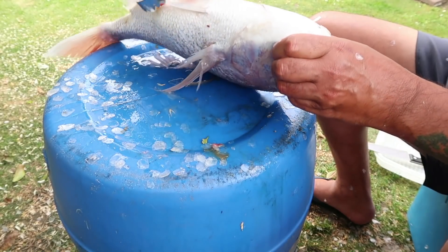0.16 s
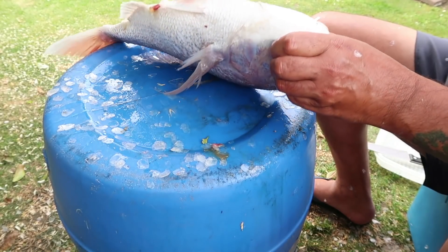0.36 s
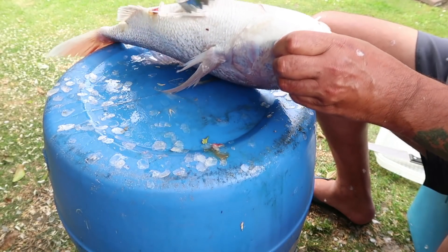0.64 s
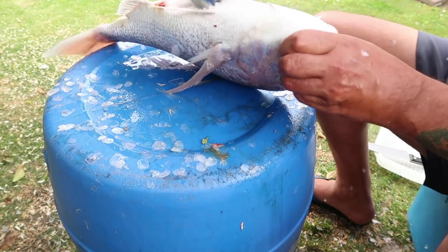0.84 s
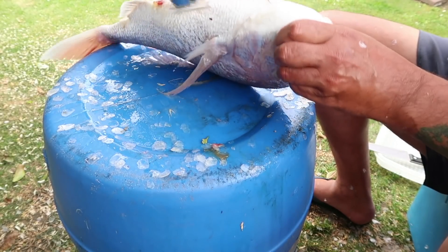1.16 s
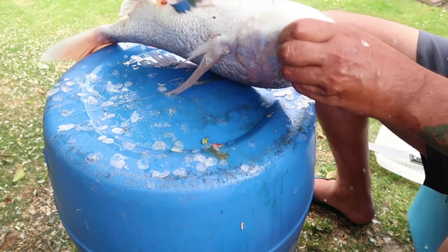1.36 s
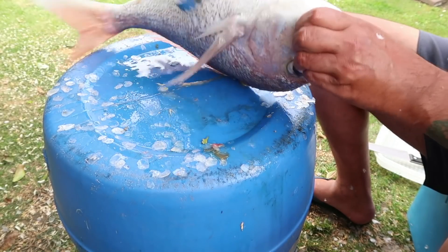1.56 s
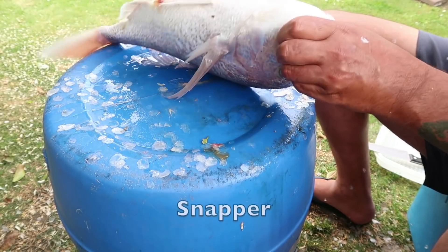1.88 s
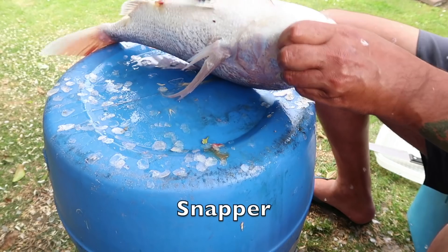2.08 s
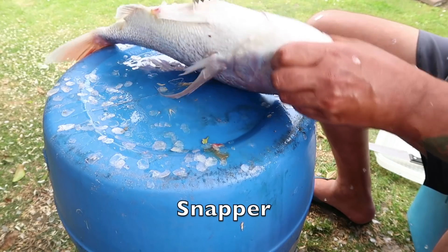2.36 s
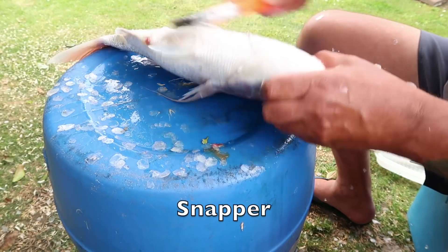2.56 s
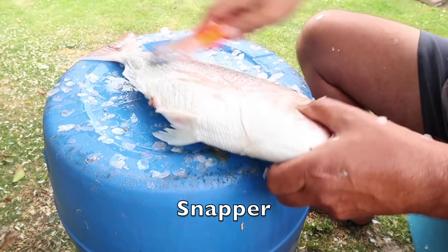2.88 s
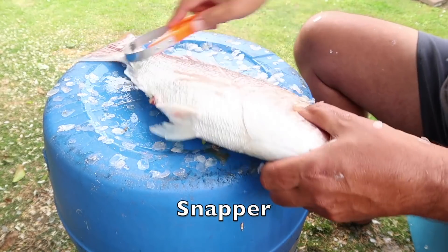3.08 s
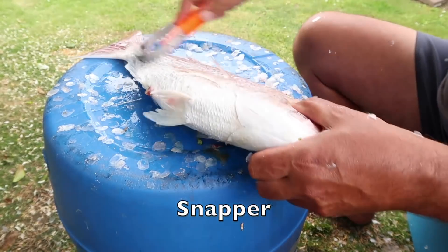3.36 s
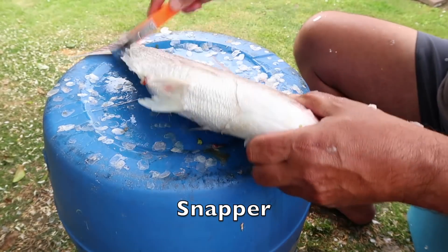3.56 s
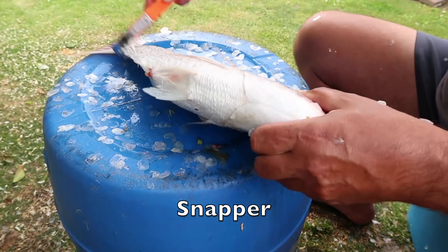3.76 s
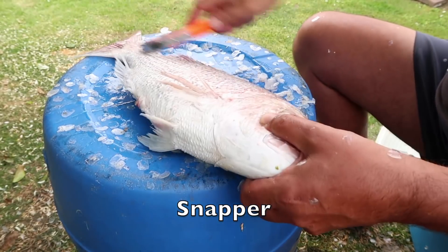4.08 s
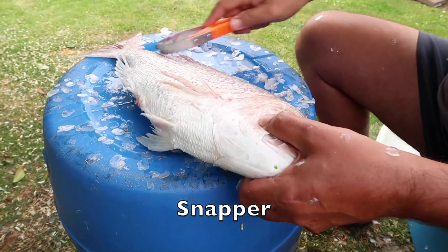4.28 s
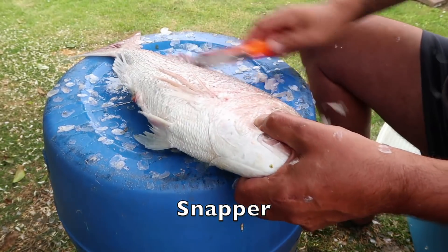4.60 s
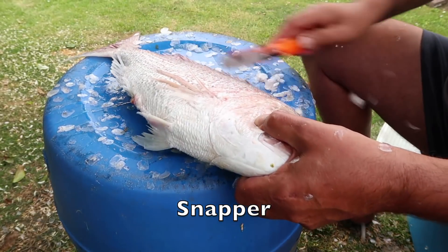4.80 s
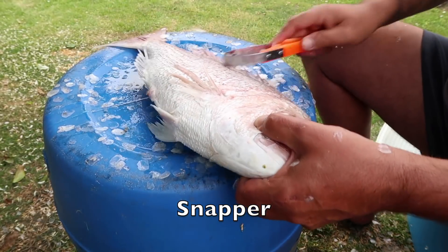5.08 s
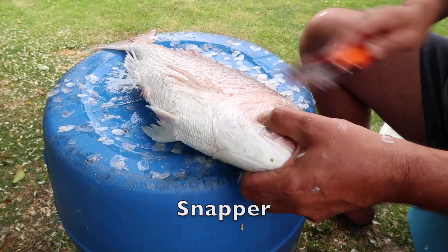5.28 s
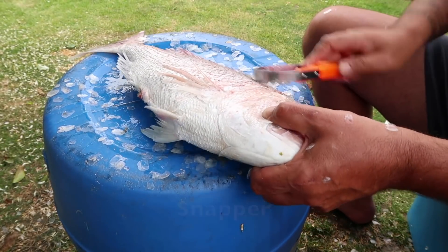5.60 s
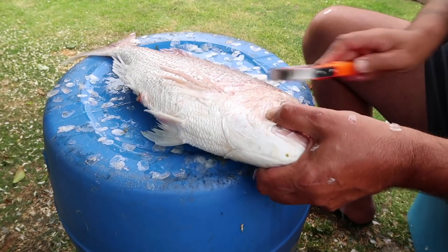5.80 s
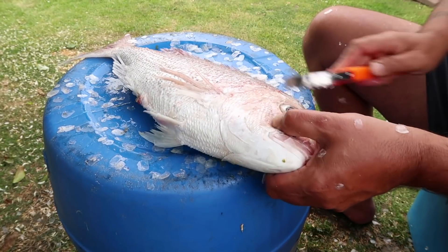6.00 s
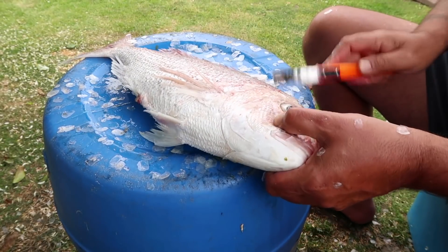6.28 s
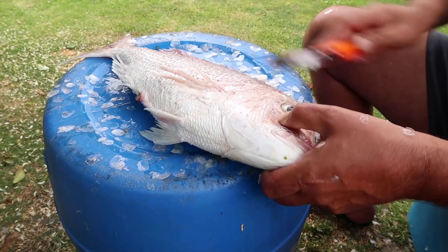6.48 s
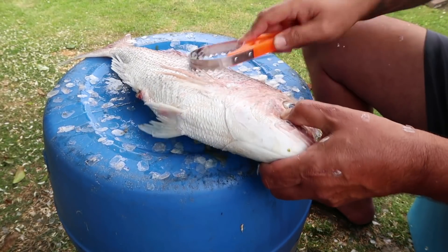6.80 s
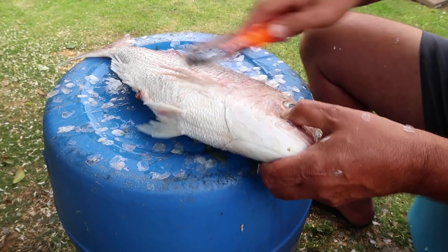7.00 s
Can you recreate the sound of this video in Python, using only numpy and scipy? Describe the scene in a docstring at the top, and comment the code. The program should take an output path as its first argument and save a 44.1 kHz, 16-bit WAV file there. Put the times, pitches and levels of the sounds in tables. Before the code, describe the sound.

Short, crunchy metal scraping strokes rip scales off a wet fish on a hollow plastic barrel outdoors, with small birds chirping behind.

```python
"""A toothed metal scraper scales a whole fish in quick strokes on a plastic barrel on a lawn.
Random clicks with tiny rips of noise ring barrel, flesh, skin, blade and teeth, and crackle through a filter.
Loud single scales snap the same way; dull knocks of flesh and barrel are short decaying low sines.
Small birds chirp, whistle and chatter as gliding sines with diffuse echoes, over soft filtered-noise air."""
import sys
import numpy as np
from scipy import signal
from scipy.fft import rfft, irfft
from scipy.io import wavfile
from scipy.ndimage import uniform_filter1d

SR = 44100
rng = np.random.default_rng(int(sys.argv[2]) if len(sys.argv) > 2 else 0)


def waveform_to_disk(signal):
    """Save audio, clipped to [-1, 1], as 16-bit WAV at the path in sys.argv[1]."""
    frames = np.transpose(np.atleast_2d(signal))
    scaled = np.clip(frames, -1, 1) * 32767
    samples = np.round(scaled).astype(np.int16)
    wavfile.write(sys.argv[1], SR, samples)


N = 315226
TIME = np.arange(N) / SR  # s

# scraper strokes, and at 2.44 s the fish shifting on the barrel;
# press on the fish and bite into the scales are relative to an ordinary stroke:
# start_s, swell_s, fade_s, press_db, bite_db
MOVES = [(0.621, 0.015, 0.0079, -16, -18.5), (.81, 0.033, 0.042, -1.5, -3.5),
         (0.928, 0.003, 0.086, -14, -19), (1.023, 0.065, 0.009, 8.5, 4.5), (1.147, .021, 0.054, -7, -14),
         (1.242, 0.0071, 0.031, 1.5, 0), (1.293, .017, 0.0046, 4, 8), (1.335, 0.047, 0.029, -8, -11),
         (1.44, .01, 0.023, 3, -5), (1.549, 0.033, 0.0087, -4, -9), (1.876, .045, 0.01, -20, -11.5),
         (2.073, 0.053, 0.0066, -6, -8), (2.344, 0.03, 0.0066, -1.5, -7), (2.441, 0.063, 0.075, -7, -25),
         (2.625, 0.022, 0.058, 2, -0.5), (2.71, 0.029, 0.081, -15, -10), (2.928, 0.034, 0.069, 3, 1.5),
         (3.199, 0.045, 0.033, 7, 7.5), (3.405, 0.031, 0.065, 2, 1.5), (3.688, 0.045, 0.011, -3, 3),
         (3.852, 0.031, 0.047, -3, 7.5), (4.13, 0.071, 0.051, -3.5, -2), (4.404, 0.093, 0.02, 4, 2),
         (4.672, 0.021, 0.033, 6.5, 0), (4.724, 0.023, 0.048, 0.5, 4.5), (4.941, 0.04, 0.016, 5, 6.5),
         (5.025, 0.038, 0.031, -3.5, 1.5), (5.177, 0.035, 0.06, 0, -7.5), (5.456, 0.019, 0.073, 2.5, -0.5),
         (5.692, 0.064, 0.026, -2.5, -5), (5.961, 0.012, .051, -5, -7), (6.168, 0.039, .03, -2, -4),
         (6.396, .008, 0.043, 1.5, -0.5), (6.68, 0.053, 0.017, 10.5, 1.5), (6.898, 0.025, 0.051, 5.5, 3),
         (6.945, 0.016, 0.014, 12.5, 7.5), (7.015, 0.023, 0.0053, -0.5, -14.5),
         (7.131, 0.014, .005, -4, -16)]
# single scales that snap loudly; brightness below 0 is a dull clack, above 0 a crisp tick:
# start_s, level_db, brightness_db
SNAPS = [(0.368, -14, -1), (.839, -0.5, 1), (1.061, 2.5, -3), (1.0793, -2.5, 9.5), (1.2514, 2, 2.5),
         (1.295, -5.5, 7.5), (1.5747, -12, 2), (1.853, -21, -7), (2.6267, -16, -5), (2.7557, -18, 13),
         (2.932, -7, 1), (2.952, -7, 1), (2.9589, -1.5, 3), (3.1562, -29, 21.5), (3.2032, -13, 5),
         (3.2173, -5, 5), (3.2686, -7, 4.5), (3.4101, -12.5, 6), (3.648, -14.5, -1), (3.6878, -7.5, 6),
         (3.7031, -1, 3), (3.717, -7.5, 4), (3.8583, -8, 4), (3.8796, 2, 3.5), (3.8906, 2, 0.5),
         (4.0507, -23, 4), (4.2429, -13.5, 13.5), (4.3948, -13, 5), (4.4991, -7.5, 11.5), (4.6917, -5, 0),
         (4.7425, -3.5, 8), (4.7698, -5, -5), (4.7813, -1.5, -6), (4.9843, -1.5, -14.5), (4.9915, 1, -9.5),
         (5.969, -10, 7), (6.1923, -7.5, 1), (6.4033, -9, 5), (6.7191, -10.5, -17.5), (6.7311, -.5, 4),
         (6.772, -7, 2.5), (6.924, -5, 11.5), (6.9535, -4.5, -16), (6.9607, 3, -7.5)]
# the barrel takes the weight of hand and fish: start_s, level_db
THUMPS = [(0.373, -32), (1.457, -24.5), (2.37, -24), (3.731, -23), (4.245, -21), (4.502, -18), (5.44, -11),
          (5.666, -23.5), (6.438, -27), (6.652, -7.5), (6.865, -15.5), (7.108, -21.5)]
# the lid's low modes under each thump: pitch_hz, level_db
THUMP_MODES = [(74, 1), (128, -17)]
# dull knocks: wet flesh pats on the lid, and at 6.68 s a low barrel boom: start_s, level_db, pitch_hz
DULL_KNOCKS = [(.653, -30.5, 278), (.848, -18.5, 250), (1.036, -19, 260), (1.3, -20.5, 311),
               (1.445, -22.5, 272), (2.086, -26.5, 290), (2.367, -17.5, 263), (2.625, -21.5, 240),
               (2.666, -20.5, 290), (3.235, -15, 198), (3.498, -23, 290), (4.2, -24.5, 207),
               (4.46, -20.5, 275), (4.987, -14.5, 381), (6.68, -9, 125), (6.712, -15, 592)]

# resonances of the plastic barrel: pitch_hz, width_hz, level_db
BARREL_MODES = [(65.4, 17.2, 3.5), (98, 32.4, -1), (125.7, 21, -1.5)]
# resonances of the flesh: pitch_hz, width_hz, level_db
FLESH_MODES = [(198.3, 61, 1.5), (267, 92, 0.5), (359, 68.4, -2), (567, 87, -7.5)]
# resonances of the skin: pitch_hz, width_hz, level_db
SKIN_MODES = [(737, 224, -0.8), (1113, 160, -1), (1381, 120, -2), (1559, 53, 1.5)]
# resonances of the metal blade: pitch_hz, width_hz, level_db
BLADE_MODES = [(1860, 325, -2), (2110, 98, 2.5), (2288, 213, 0.5), (2860, 350, -2.5), (3120, 137, 1.5),
               (3590, 620, -6.5)]
# resonances of the scraper's teeth: pitch_hz, width_hz, level_db
TEETH_MODES = [(3560, 154, 12.5), (3920, 76, 4), (4530, 330, -6)]
# filter curve for the crackle of tearing scales: frequency_hz, gain_db
CRACKLE_SPECTRUM = [(2500, -18), (4200, -0.5), (6300, -2), (7300, -6), (8200, -12.5), (10000, -1),
                    (11800, 0.5), (13300, -5.5), (14700, -15), (16000, -29.5)]
# crackle changes with the patch of skin under the blade: time_s, gain_db
CRISPNESS = [(.8, 1), (2.35, 3), (2.9, -3.5), (3.3, -3.5), (3.85, 0.5), (4.3, 5), (4.95, 2.5), (5.05, -7),
             (5.6, -0.5), (5.97, 9), (6.2, 1), (6.95, 2)]
# the barrel answers less while the fish is held on its edge: time_s, gain_db
CONTACT = [(1.3, -7.5), (2.3, 0), (7, 0.5)]

# first syllable of the near bird's chirp: offset_s, pitch_hz, level_db
ARCH = [(0, 3700, -20), (.005, 4400, -5), (.011, 5200, -1), (.018, 5400, 0), (.031, 5180, -1),
        (.038, 4500, -5), (.044, 4080, -3), (.048, 4550, -4), (.053, 3500, -15), (.059, 2950, -26)]
# second syllable, its pitch range restretched for each chirp: offset_s, pitch_hz, level_db
WARBLE = [(0, 2950, -20), (.007, 3500, 0), (.014, 3950, 0), (.020, 4450, -1), (.026, 4620, -1),
          (.034, 3720, -3), (.039, 4150, -6), (.043, 3300, -10), (.048, 4100, -9), (.055, 3000, -17)]
# near chirps: start_s, arch_db, warble_db, warble_top_hz
CHIRPS = [(.778, -23.5, -25.5, 4560), (2.356, -23, -24.5, 4430), (3.495, -22.5, -21.5, 4570),
          (4.818, -24.5, -22.5, 4350), (5.855, -28.5, -25, 4550)]
# a plain rounded chirp: offset_s, pitch_hz, level_db
PEEP = [(0, 3600, -19), (.01, 4250, -7), (.019, 5120, -1), (.029, 5300, 0), (.04, 5150, -2),
        (.053, 4150, -10), (.059, 3700, -23)]
# the clearer far whistles, levels relative: start_s, length_s, first_pitch_hz, level_db
WHISTLES = [(0.46, 0.31, 4780, -59), (.577, 0.15, 3680, -53.5), (1.528, 0.14, 3900, -49.5),
            (1.979, 0.16, 4200, -55), (4.515, 0.077, 3290, -51), (6.076, 0.11, 3920, -50.5),
            (6.495, 0.23, 1960, -59.5), (6.527, 0.061, 4010, -49), (6.581, 0.071, 3460, -51.5),
            (6.827, 0.15, 3800, -50.5)]
# harsh trilling bursts: a scolding bird, and at 5.03 s a short scraper rasp; levels relative:
# start_s, length_s, first_pitch_hz, level_db
HARSH_TRILLS = [(1.58, 0.17, 2345, -30), (2.779, 0.2, 2203, -31.5), (2.8, 0.24, 3050, -39),
                (2.979, 0.14, 2150, -33.5), (4.103, 0.13, 2610, -35.5), (4.247, .134, 2273, -35.5),
                (5.031, 0.033, 2930, -20.5), (5.588, 0.27, 2520, -37)]

# filter curve of the open-air background: frequency_hz, gain_db
AIR_SPECTRUM = [(15, -56), (25, 5), (80, 4), (161, -5.5), (301, -11.5), (451, -7.5), (591, -11.5),
                (1440, -15.5), (3340, -16.5), (4490, -20), (8590, -36.5), (10400, -31.5), (12200, -34),
                (14000, -40), (16000, -54)]
# side-channel gain of the close fish sound: frequency_hz, side_db
NEAR_WIDTH = [(60, -76), (250, -63), (1000, -50), (2400, -50), (4400, -5.5), (7000, -1.5), (15000, -3)]
# side-channel gain of the air: frequency_hz, side_db
AIR_WIDTH = [(60, -39), (200, -7.5), (400, -5.5), (2400, -15), (8000, 3.5), (15000, 1)]
# side-channel gain of the echoes: frequency_hz, side_db
ECHO_WIDTH = [(2500, -58), (3400, -6), (5500, -3.5)]

# pressing moves barrel and flesh, biting drives skin, blade and crackle:
# base level of an ordinary stroke, and dB gained per dB of effort
BARREL_DB, BARREL_FOLLOWS = -33, 0.52
FLESH_DB, FLESH_FOLLOWS = -32.5, 0.97
SKIN_DB, SKIN_FOLLOWS = -36, 0.53
BLADE_DB, BLADE_FOLLOWS = -28, 0.95
CRACKLE_DB, CRACKLE_FOLLOWS = -38, 0.95
# skin and crackle of a snap of middle brightness, relative to the snap's level
SNAP_SKIN_DB, SNAP_CRACKLE_DB = -3.5, -5
WHISTLE_SAG_HZ_PER_S = 6000  # for first notes above 3 kHz; a tenth of it below 2 kHz
TRILL_SAG_HZ_PER_S = 1300  # each burst sinks as it runs on
WARBLE_DELAY_S = 0.059  # after the start of the arch
PEEP_START_S, PEEP_DB = 6.306, -28.5
# lead of the left ear over the right; negative reaches the right ear first
NEAR_LEAD_S, FAR_LEAD_S = -0.000016, 0.000018
GROUND_ECHO_S, GROUND_ECHO_DB = 0.0057, -13  # the near bird's bounce off the lawn
AIR_DB = -44.36  # middle of the wavering level
CUTOFF_HZ = 15900


def from_db(db):
    """Decibels to gain."""
    return 10 ** (np.asarray(db) / 20)


def along(curve, times):
    """Read a (time, value) curve at the given times."""
    return np.interp(times, *np.transpose(curve))


def rms_one(x):
    """Bring a sound to unit rms."""
    return x / np.sqrt(np.mean(x ** 2) + 1e-20)


def evened(x, window_s):
    """Hold unit level over each short window; the grain inside it stays."""
    power = np.abs(uniform_filter1d(x ** 2, max(int(window_s * SR), 8)))
    return x / np.sqrt(power + 1e-12)


def low_passed(x, hz):
    """Gentle second-order low-pass."""
    return signal.sosfilt(signal.butter(2, min(hz, SR * .45), fs=SR, output="sos"), x)


def drift(hz):
    """Random wander slower than about hz, with unit rms."""
    settled = low_passed(rng.standard_normal(N + SR), hz)[SR:]
    return rms_one(settled)


def coloured(x, spectrum, size=2048):
    """Minimum-phase filter whose gain follows a (Hz, dB) table."""
    hz, db = np.transpose(spectrum)
    grid = np.maximum(np.arange(size // 2 + 1) * SR / size, 1)
    gain = from_db(np.interp(np.log(grid), np.log(hz), db))
    cepstrum = irfft(np.log(gain))
    # folding the cepstrum makes the response causal
    cepstrum[1:size // 2] *= 2
    cepstrum[size // 2 + 1:] = 0
    response = np.array(irfft(np.exp(rfft(cepstrum))), ndmin=x.ndim)
    return signal.fftconvolve(x, response, axes=-1)[..., :x.shape[-1]]


def resonate(x, modes):
    """Parallel two-pole resonances of (Hz, width Hz, dB), alternating in sign."""
    out = 0
    for k, (hz, width, db) in enumerate(modes):
        r = np.exp(-np.pi * width / SR)
        poles = [1, -2 * r * np.cos(2 * np.pi * hz / SR), r * r]
        gain = (-1) ** k * from_db(db) * (1 - r * r) / 2
        out = out + gain * signal.lfilter([1, 0, -1], poles, x + 1e-18)
    return out


def stereo(mid, side):
    """Left and right from mid and side."""
    return np.array([mid + side, mid - side])


def placed(x, lead_s):
    """A source off to one side reaches one ear slightly earlier; its slope stands in for the delay."""
    return stereo(x, lead_s / 2 * np.gradient(x, TIME))


def scatter(x, t60, delay_s):
    """Diffuse reflections: a unit-energy noise tail that dies 60 dB in t60 seconds."""
    t = TIME[:SR // 2]
    tail = rng.standard_normal(len(t)) * from_db(-60 * t / t60) * (t > delay_s)
    tail = tail / np.sqrt(np.sum(tail ** 2) + 1e-20)
    return signal.fftconvolve(x, tail)[:N]


def garden(x, wet_db, t60):
    """Leaves and walls send back a diffuse tail, wide in the treble."""
    mid = scatter(x, t60, 0.008)
    side = coloured(scatter(x, t60, 0.0013), ECHO_WIDTH)
    return from_db(wet_db) * stereo(mid, side)


def air():
    """Soft outdoor background: coloured noise whose level wavers slightly."""
    mid, side = (coloured(rng.standard_normal(N), AIR_SPECTRUM) for channel in range(2))
    level = from_db(AIR_DB + 0.57 * drift(8.7))
    return level * stereo(rms_one(mid), coloured(rms_one(side), AIR_WIDTH))


def chorus():
    """Many very distant birds blur into a shimmer: four unsteady tones fade in and out."""
    out = 0
    for hz in (2720, 3260, 3810, 4290):
        pitch = hz * (1 + 0.052 * drift(60))
        level = from_db(28 * np.tanh(drift(13.7)))
        out = out + level * np.sin(2 * np.pi * np.cumsum(pitch) / SR)
    return from_db(-55) * rms_one(out)


def far_birds():
    """Glides from distant trees: high notes fall and quaver, low ones hold nearly steady."""
    out, quaver = np.zeros(N), 0.0622 * drift(160)
    for start, length, first_hz, db in WHISTLES:
        a, b = np.searchsorted(TIME, [start, start + length])
        agility = np.interp(first_hz, [2000, 3000], [.1, 1])
        glide = first_hz - agility * WHISTLE_SAG_HZ_PER_S * TIME[:b - a]
        pitch = glide * (1 + agility * quaver[a:b])
        swell = from_db(db + 9.5) * signal.windows.tukey(b - a, .5)
        out[a:b] += swell * np.sin(2 * np.pi * np.cumsum(pitch) / SR)
    return out


def harsh_trills():
    """Bird chatter and one rasp: runs of quick upward flicks with roughened pitch, plus their echo."""
    out, rasp, unsteady = np.zeros(N), drift(290), drift(49)
    for start, length, first_hz, db in HARSH_TRILLS:
        a, b = np.searchsorted(TIME, [start, start + length])
        flick_rate_hz = 68 * (1 + .2 * unsteady[a:b])
        flick = np.cumsum(flick_rate_hz) / SR % 1  # 0 to 1 through each flick
        sinking = first_hz - TRILL_SAG_HZ_PER_S * TIME[:b - a]
        pitch = sinking * (1 + .4 * (flick - .5) + .06 * rasp[a:b])
        swell = np.interp(np.linspace(0, 1, b - a), [0, .25, 1], [.3, 1, .25])
        pulses = from_db(db + 4.5) * swell * np.sin(np.pi * flick) ** 2
        out[a:b] += pulses * np.sin(2 * np.pi * np.cumsum(pitch) / SR)
    return out + garden(out, wet_db=-2, t60=.2)


def syllable(points, start, level_db):
    """A nearly pure whistle that follows (s, Hz, dB) points with a slight pitch tremble."""
    offsets, hz, db = np.transpose(points)
    s = start + offsets
    out = np.zeros(N)
    a, b = np.searchsorted(TIME, [s[0], s[-1]])
    tremble = 1 + .1 * rng.standard_normal(b - a)
    pitch = uniform_filter1d(np.interp(TIME[a:b], s, hz) * tremble, size=80)
    level = from_db(level_db + np.interp(TIME[a:b], s, db)) * signal.windows.tukey(b - a, .1)
    out[a:b] = level * np.sin(2 * np.pi * np.cumsum(pitch) / SR)
    return np.sqrt(2) * out


def near_bird():
    """Two-part chirps and a plain one; the warble starts alike but climbs to differing heights."""
    out = syllable(PEEP, PEEP_START_S, PEEP_DB)
    offsets, hz, db = np.transpose(WARBLE)
    for s, arch_db, warble_db, top_hz in CHIRPS:
        stretched_hz = np.interp(hz, [hz.min(), hz.max()], [hz.min(), top_hz])
        warble = np.transpose([offsets, stretched_hz, db])
        out += syllable(ARCH, s, arch_db)
        out += syllable(warble, s + WARBLE_DELAY_S, warble_db)
    return out


def grounded(x):
    """The bounce off the ground beats against a gliding note and makes it flutter."""
    return x + from_db(GROUND_ECHO_DB) * np.interp(TIME - GROUND_ECHO_S, TIME, x)


def knocks(rows, rise_s, t60):
    """Soft blows: each (s, dB, Hz) row is a low sine that swells and dies."""
    out, t = np.zeros(N + SR), TIME[:SR // 2]
    shape = (1 - np.exp(-(t / rise_s) ** 2)) * from_db(-60 * t / t60)
    for s, db, hz in rows:
        at = int(s * SR)
        out[at:at + len(t)] += from_db(db) * shape / shape.max() * np.sin(2 * np.pi * hz * t)
    return out[:N]


def barrel_thumps():
    """The barrel takes the weight of hand and fish: two low modes of the lid sound together."""
    rows = [(s, db + mode_db, hz) for s, db in THUMPS for hz, mode_db in THUMP_MODES]
    return knocks(rows, rise_s=0.0029, t60=0.12)


def dull_knocks():
    """Wet flesh pats on the lid and one low barrel boom: a heavily damped tone each."""
    return knocks(DULL_KNOCKS, rise_s=0.0055, t60=0.037)


def tearing(clicks, tear_s, tear_db):
    """Each snap is a click and a very short rip of noise; the rip differs between mid and side."""
    r = np.exp(-1 / (tear_s * SR))
    power = signal.lfilter([1 - r], [1, -r], clicks ** 2 + 1e-18)
    rip = from_db(tear_db) * np.sqrt(power) * rng.standard_normal((2, len(clicks)))
    return rip + np.outer([1, 0], clicks)  # the click itself is mid only


def scales(per_s, spread_db):
    """Teeth catch scales at random, in clumps, as snaps of uneven size."""
    caught = rng.random(N) < per_s * from_db(2.5 * drift(120)) / SR
    sizes = from_db(spread_db * np.minimum(rng.exponential(1, N), 4))
    clicks = caught * sizes * rng.choice([-1, 1], N)
    return tearing(clicks, tear_s=.001, tear_db=0.5)


def slips(per_s, spread_db):
    """The blade jumps from one row of scales to the next at uneven intervals."""
    draws = rng.standard_normal((2000, 3))
    intervals_s = np.exp(.4 * draws[:, 0]) / per_s
    at = (np.cumsum(intervals_s) * SR).astype(int)
    sizes = from_db(spread_db * draws[:, 1]) * np.sign(draws[:, 2])
    clicks = np.bincount(at[at < N], sizes[at < N], N)
    return tearing(clicks, tear_s=.0006, tear_db=-1)


def handling():
    """Wet fingers and loose scales tick faintly throughout, most audible between the strokes."""
    ticks = scales(per_s=110, spread_db=4.5)
    crisp = from_db(-65.5) * rms_one(coloured(ticks, CRACKLE_SPECTRUM))
    hard = from_db(-65.5) * rms_one(resonate(ticks, SKIN_MODES + BLADE_MODES))
    soft = from_db(-54.5) * rms_one(resonate(ticks, FLESH_MODES))
    return crisp + hard + soft


def snaps(size=1024):
    """Big scales flick off the teeth: a clack of blade and skin with a crisp top."""
    out = np.zeros((2, N + size))
    for s, db, bright_db in SNAPS:
        flick = tearing(signal.unit_impulse(size), tear_s=0.0017, tear_db=-0.5)
        parts = [(resonate(flick, BLADE_MODES), 5.5),
                 (resonate(flick, TEETH_MODES), -1.0),
                 (resonate(flick, SKIN_MODES), SNAP_SKIN_DB - bright_db),
                 (coloured(flick, CRACKLE_SPECTRUM), SNAP_CRACKLE_DB + bright_db)]
        at = int((s + 0.000995) * SR)
        for ring, level_db in parts:
            out[:, at:at + size] += from_db(db + level_db) * ring / np.linalg.norm(ring[0])
    return out[:, :N]


def pressure(levels_db, edge_db, release_s, lag_s):
    """Gain of one layer: each move sets in, swells to its hardest point, fades and lets go."""
    gain = np.zeros(N)
    for (start, swell, fade, *_), db in zip(MOVES, levels_db):
        times = start + lag_s + np.cumsum([0, .004, swell, fade, release_s])
        a, b = np.searchsorted(TIME, [times[0], times[-1]])
        move = from_db(db + np.interp(TIME[a:b], times, [-24, edge_db, 0, edge_db, -30]))
        gain[a:b] = np.hypot(gain[a:b], move)  # overlapping moves add in power
    return gain


def scraping():
    """Slips and snapping scales drive barrel, flesh, skin, blade and teeth, and crackle by themselves."""
    fine = rms_one(scales(per_s=900, spread_db=-1.5))
    rows = rms_one(slips(per_s=160, spread_db=2.0))
    grains = fine + from_db(-4) * rows
    rasp = rows + from_db(-7) * fine
    start, _, _, press, bite = np.transpose(MOVES)

    # a negative lag starts a layer ahead of the table's start time
    barrel_db = BARREL_DB + BARREL_FOLLOWS * press + along(CONTACT, start)
    barrel_gain = pressure(barrel_db, edge_db=-4.0, release_s=0.095, lag_s=0.0021)
    out = barrel_gain * evened(resonate(grains, BARREL_MODES), 0.062)

    flesh_db = FLESH_DB + FLESH_FOLLOWS * press
    flesh_gain = pressure(flesh_db, edge_db=-9.0, release_s=0.029, lag_s=-0.0034)
    out += flesh_gain * evened(resonate(grains, FLESH_MODES), 0.015)

    skin_db = SKIN_DB + SKIN_FOLLOWS * bite
    skin_gain = pressure(skin_db, edge_db=-8, release_s=0.042, lag_s=-0.0065)
    out += skin_gain * evened(resonate(rasp, SKIN_MODES), 0.025)

    blade_db = BLADE_DB + BLADE_FOLLOWS * bite
    blade_gain = pressure(blade_db, edge_db=-10.5, release_s=0.022, lag_s=-0.0051)
    out += blade_gain * evened(resonate(rasp, BLADE_MODES), 0.032)

    crackle = from_db(4.5) * evened(coloured(grains, CRACKLE_SPECTRUM), 0.063)
    teeth = from_db(0.5) * evened(resonate(grains, TEETH_MODES), 0.014)
    bright_db = CRACKLE_DB + CRACKLE_FOLLOWS * bite + along(CRISPNESS, start)
    bright_gain = pressure(bright_db, edge_db=-13.0, release_s=0.045, lag_s=-0.0033)
    return out + bright_gain * (crackle + teeth)


def scene():
    """The fish is close and central; the birds are farther off."""
    far = far_birds() + scatter(chorus(), t60=0.15, delay_s=0.004)
    far_stereo = from_db(4) * placed(far, FAR_LEAD_S) + garden(far, wet_db=-4, t60=0.57)
    near = from_db(0.1) * grounded(near_bird())
    near_stereo = placed(near, NEAR_LEAD_S) + garden(near, wet_db=-11.5, t60=0.19)
    surroundings = air() + far_stereo + harsh_trills() + near_stereo

    fish, side = scraping() + snaps() + handling()
    fish = fish + barrel_thumps() + dull_knocks()
    fish_stereo = stereo(fish, coloured(side, NEAR_WIDTH)) + garden(fish, wet_db=-16, t60=0.067)
    return surroundings + fish_stereo


def record(dry):
    """The microphone sheds deep rumble; peaks are rounded and the top is cut."""
    lean = signal.sosfilt(signal.butter(2, 42, "high", fs=SR, output="sos"), dry)
    rounded = np.tanh(lean)
    return signal.sosfilt(signal.ellip(10, .2, 80, CUTOFF_HZ, fs=SR, output="sos"), rounded)


dry = scene()
out = record(dry)
waveform_to_disk(out)
```